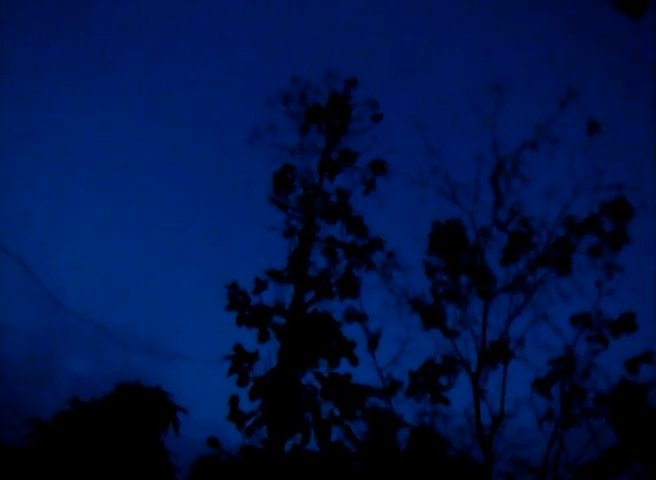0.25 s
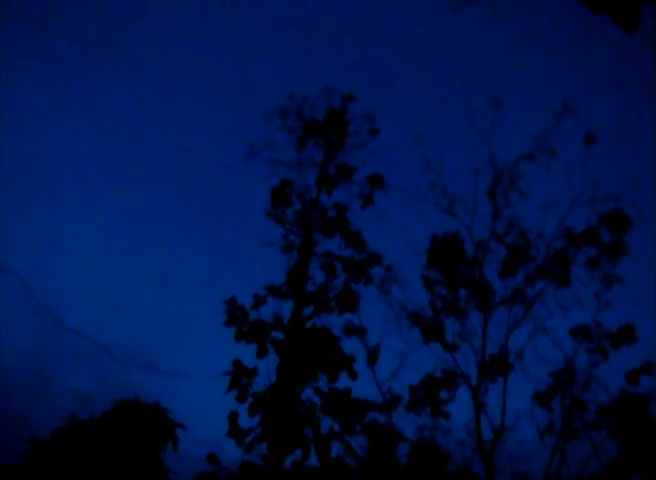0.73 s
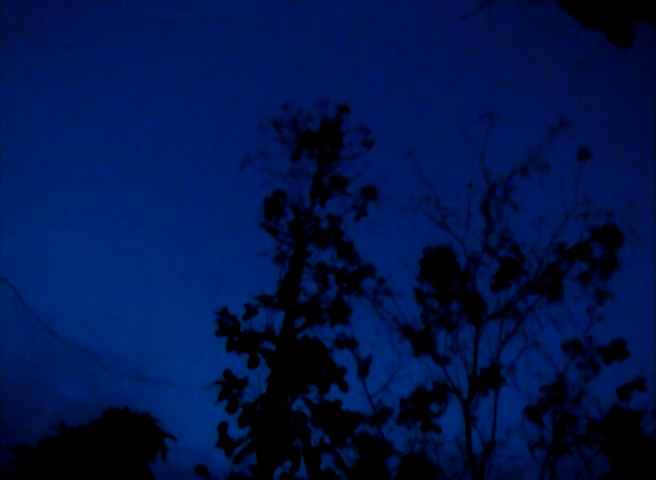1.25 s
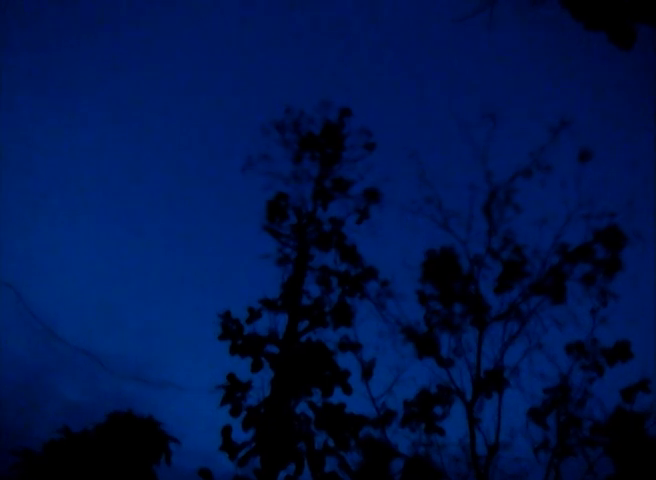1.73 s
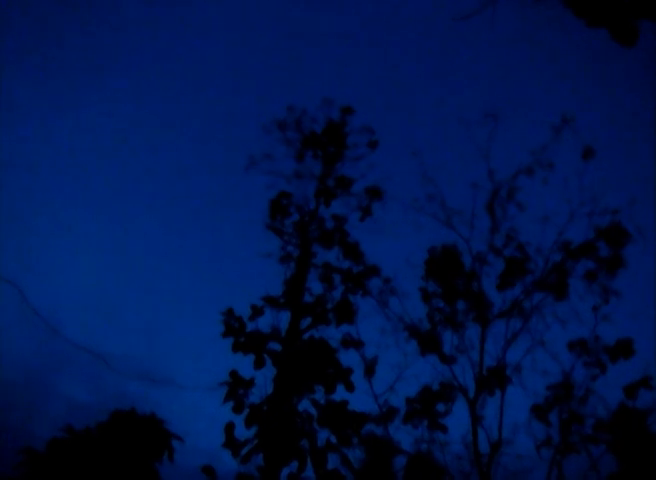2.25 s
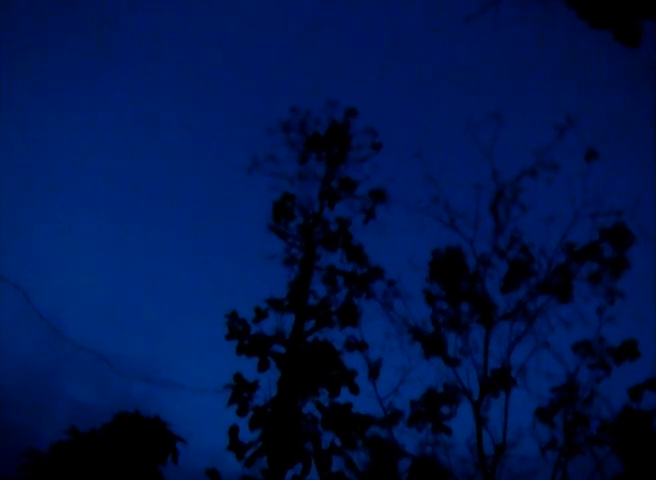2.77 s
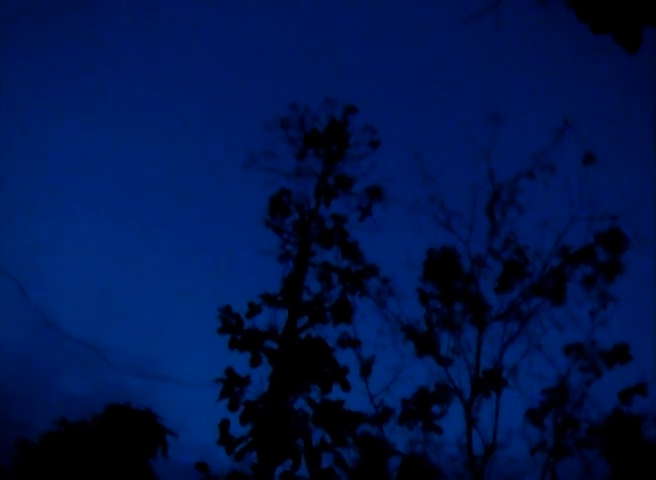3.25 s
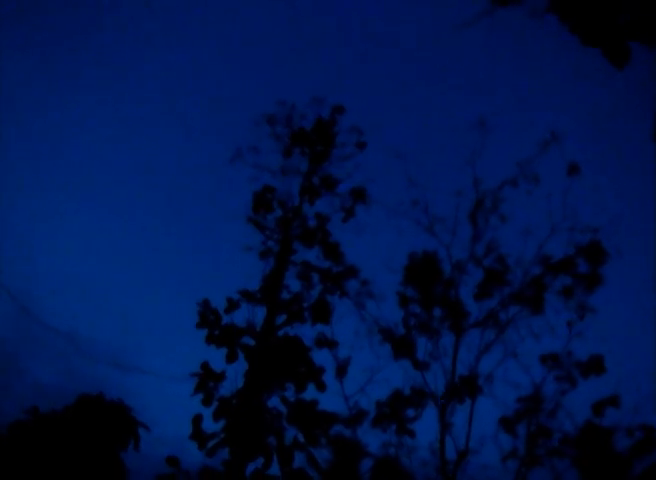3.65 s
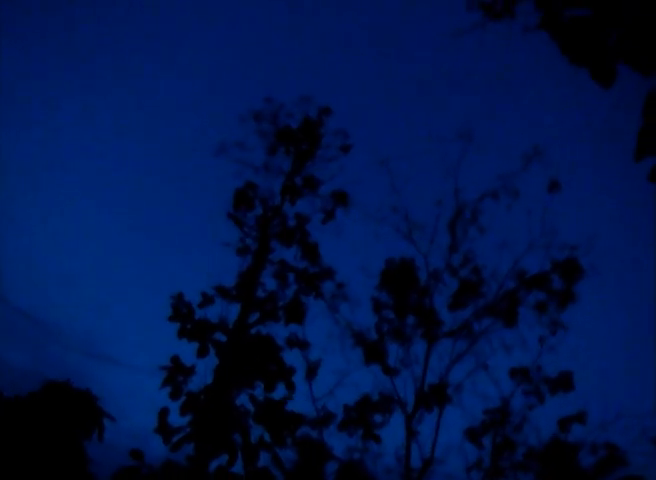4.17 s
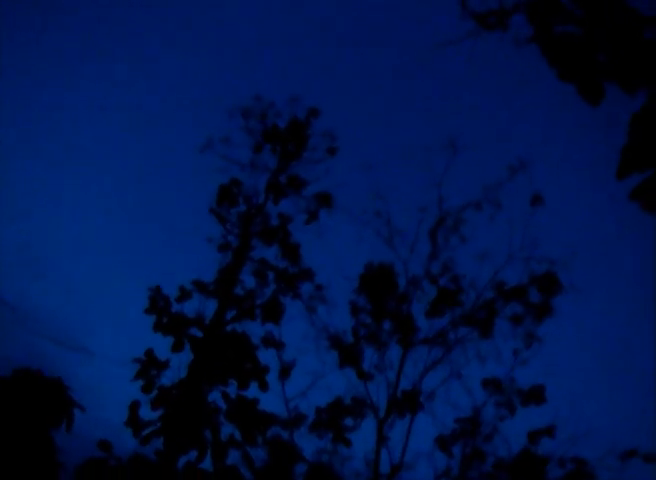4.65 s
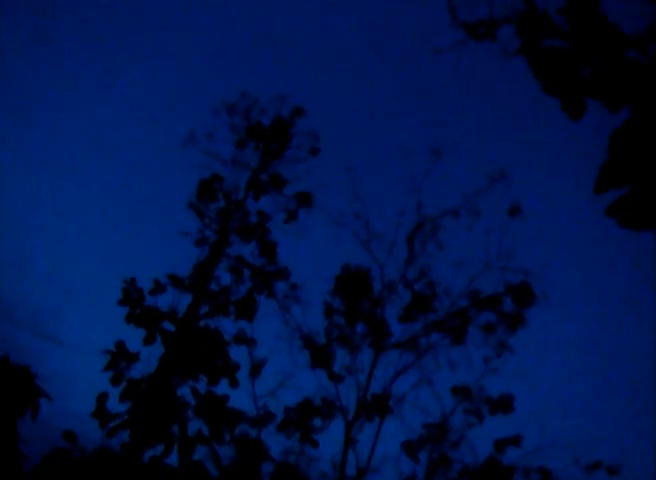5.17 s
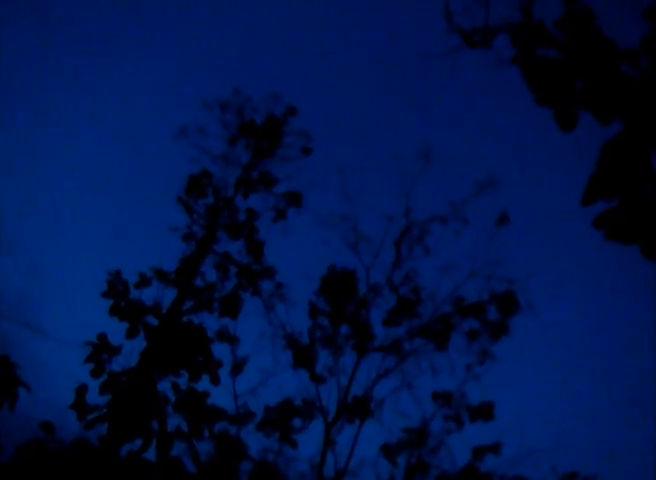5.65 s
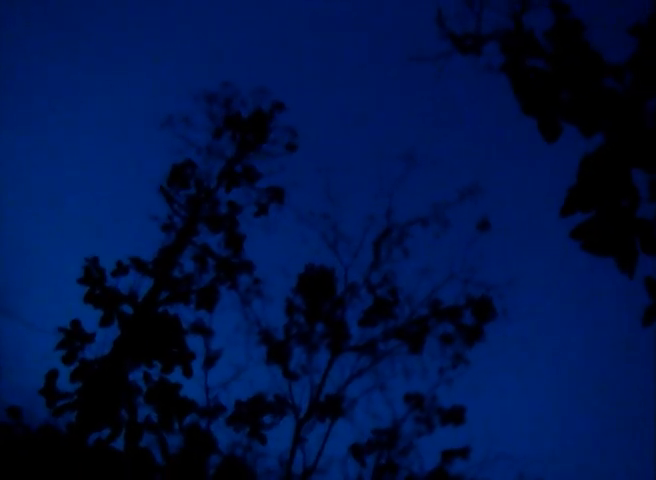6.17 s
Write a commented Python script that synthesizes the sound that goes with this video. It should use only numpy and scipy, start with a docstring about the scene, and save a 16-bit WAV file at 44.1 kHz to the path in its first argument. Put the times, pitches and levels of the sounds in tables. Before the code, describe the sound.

In a wood at dawn, a soft rush of air and wavering insect hiss lie under a blurred far flock. A small songbird slurs thin high notes while crows caw, echoing off trunks. At two seconds a close bird gives a rapid run of clear whistles sinking in pitch for about a second. More crows follow, ending with two rough, nearer caws. Single-channel, slightly dull treble.

```python
"""A wood at dawn, with a soft rush of air, a wavering hiss of insects, a far flock and a faint hum.
Crows caw near and far: harsh buzzes and breath noise, shaken by a rattle and shaped by a throat.
A small songbird slurs thin high notes, each a tone that bends through an arc.
A close bird gives a quick run of whistles that falls in pitch: tones with two weak overtones.
Trunks scatter every call, made by adding many small reflections; one faint dry tick is heard too."""
import sys
import numpy as np
from scipy import signal
from scipy.fft import rfft, irfft, next_fast_len
from scipy.io import wavfile
from scipy.ndimage import map_coordinates

SR = 44100
rng = np.random.default_rng(int(sys.argv[2]) if len(sys.argv) > 2 else 0)


def unload_audio(sound):
    """Save the sound as a 16-bit wav file, at the path given as the first command line argument."""
    columns = np.transpose(np.atleast_2d(sound))
    # keep every value between -1 and 1, then stretch to whole-number steps
    steps = np.round(np.clip(columns, -1, 1) * 32767)
    wavfile.write(sys.argv[1], SR, steps.astype(np.int16))


N = 282681
TIME = np.arange(N) / SR
CUTOFF_HZ = 10100

# rush of distant air, as a noise spectrum: (frequency [Hz], relative level [dB])
AIR = [(25, -32.5), (60, -18), (120, -8.5), (200, -2), (300, -0.5), (400, 3), (520, 0), (800, 1),
       (1700, -3), (2500, -3.5), (3500, -6.5), (5600, -9.5), (8000, -10), (10000, -18)]
# two bands of hiss, as noise spectra: (frequency [Hz], relative level [dB])
HIGH_HISS = [(5500, -22.5), (6400, 1.5), (6900, 6.5), (7250, -0.5), (7900, -44.5)]   # insects
LOW_HISS = [(3700, -27.5), (4250, -3.5), (4550, -1), (4950, -3), (5600, -33)]   # insects, and at first also a haze echoing the songbird
# cawing from far away, blurred into noise: (frequency [Hz], relative level [dB])
FLOCK = [(700, -24), (950, -4), (1300, -2), (1780, 6.5), (2100, -4.5), (2500, -32.5)]
# spells in which the 4.5 kHz hiss is louder: first a haze echoing the songbird, later insects:
# (start [s], end [s], lift [dB])
HISS_SPELLS = [(0, 0.753, 7.5), (4.3, 5.343, 5)]
# songbird notes, with levels before the wood is added: (start [s], length [s], first pitch [Hz],
# middle pitch [Hz], last pitch [Hz], peak level [dB], place of the peak in the note [0-1])
SLURS = [(0, 0.13, 3680, 3860, 4480, -25, 0.48), (0.176, 0.13, 5410, 4590, 4130, -30.5, 0.82),
         (0.395, .056, 4450, 3560, 3310, -26.5, 0.18), (0.542, 0.024, 3820, 4160, 4470, -32, 0.35),
         (0.572, .046, 5240, 4620, 3500, -28, 0.8), (0.696, 0.039, 2870, 3220, 3020, -29, .65),
         (0.911, 0.048, 3900, 4150, 4570, -31, 0.36), (0.949, .15, 3430, 3562, 3190, -27, .65),
         (1.11, .115, 3400, 3780, 3250, -31.5, 0.97), (1.504, 0.072, 4050, 4340, 4600, -32, 0.27),
         (1.556, .17, 3400, 3566, 3160, -28, 0.82), (1.736, 0.095, 3740, 3603, 3300, -37, 0.4)]
# caws: (voice [name], start [s], length [s], top pitch [Hz], last pitch [Hz], level [dB])
# the voice only picks the sound: the falling caw at 4.68 s is the "high" crow, given the "far" sound
CAWS = [("far", .57, .29, 610, 560, -37.5), ("high", .785, .265, 645, 540, -28.5),
        ("far", 1.08, .35, 536, 480, -31.5), ("deep", 1.25, .44, 472, 425, -32),
        ("far", 1.90, .48, 462, 465, -40), ("far", 2.66, .46, 474, 450, -40),
        ("far", 3.27, .32, 520, 470, -35.5), ("deep", 3.27, .41, 456, 385, -30.5),
        ("high", 3.71, .25, 645, 510, -33.5), ("hoarse", 3.76, .47, 760, 580, -41.5),
        ("far", 4.32, .36, 610, 610, -45.5), ("far", 4.68, .36, 535, 410, -40.5),
        ("far", 5.15, .40, 450, 520, -53.5), ("near", 5.607, .268, 580, 410, -25.5),
        ("near", 6.125, .345, 560, 450, -29)]
# throat resonances of each voice, beak open: (frequency [Hz], relative gain [dB])
THROATS = {"near": [(550, -33.5), (850, -17.5), (1100, 0.5), (1400, -1), (1800, 2.5), (2300, -1.5),
           (2600, -18.5), (3150, -11.5), (3540, 1.5), (3950, -18), (4900, -17.5), (5800, -11), (7300, -24),
           (10000, -32)], "deep": [(450, -40.5), (900, -1.5), (1250, -18.5), (1800, 3.5), (2300, -20.5),
           (3100, -21.5), (3570, -10.5), (4300, -25), (10000, -33)], "high": [(630, -29), (1270, 0.5),
           (1850, -1.5), (2550, -7), (3250, -16), (3900, -1.5), (4500, -16.5), (8000, -20.5),
           (10000, -28.5)], "hoarse": [(700, -30), (1400, -9.5), (2200, 0), (3500, -3.5), (5000, -30),
           (10000, -19)], "far": [(520, -33.5), (1000, -18), (1350, -6), (1800, -3), (2150, -6),
           (2600, -23), (3500, -21.5), (10000, -41.5)]}
# pitch start and harshness of each voice: (first pitch / top pitch [ratio], roughness [0-1])
VOICES = {"near": (.68, 0.68), "deep": (.92, 0.622), "high": (0.96, 0.45), "hoarse": (.92, 0.91),
          "far": (0.94, 0.601)}
# reflections of each voice, compared with its direct sound: (near scatter [dB], late echo [dB])
PLACES = {"near": (-7.5, -24.5), "deep": (-3.5, -19), "high": (-2.2, -14), "hoarse": (-9, -24),
          "far": (-2.2, -8.5)}

# average levels in the background, before its dips and lifts
AIR_DB, HIGH_HISS_DB, LOW_HISS_DB, FLOCK_DB = -43, -50, -54.5, -45
SPELL_EDGE_S = 0.12
HUM_HZ, HUM_DB = 195, -70
# all of the background but the hum dips abruptly, and later comes part of the way back
DIP_S, DIP_FALL_S, DIP_DB = 1.889, 0.024, 8.5
RETURN_S, RETURN_RISE_S, RETURN_DB = 2.85, 0.59, 3
TICK_S, TICK_DB = 6.063, -39
# the run of whistles quickens to a steady beat while its pitch sinks towards a resting note
RUN_START_S, WHISTLE_COUNT = 2.010, 13
BEAT_S, FIRST_BEAT_EXTRA_S, QUICKEN_NOTES = .0815, .033, 1.65
WHISTLE_S, WHISTLE_PER_BEAT = 0.041, 0.38   # length at the steady beat; share of extra beat time filled
FIRST_HZ, REST_HZ, SINK_S = 2924, 2521, 0.496
RUN_DB, FIRST_NOTE_SOFTER_DB = -16.5, 2.5
SWELL_DB_PER_S, PEAK_AFTER_S, FADE_DB_PER_S = 2.5, 0.83, 61.5   # swells slightly, then dies away
MELLOW_FROM_S, MELLOW_BY_S = 2.34, 2.77   # later notes start softly, with less flick and fainter overtones


def from_db(db):
    """Decibels to gain."""
    return 10 ** (np.asarray(db) / 20)


def rms_one(x):
    """Scale a sound to an average (rms) level of 1."""
    return x / np.sqrt(np.mean(x ** 2) + 1e-20)


def ramp(start_s, length_s):
    """A straight rise from 0 to 1."""
    return np.clip((TIME - start_s) / length_s, 0, 1)


def at_hz(points, hz):
    """Gain of a (frequency [Hz], level [dB]) table, read on a log-frequency axis."""
    table = np.array(points)
    log_hz = np.log(np.maximum(hz, 1))
    return from_db(np.interp(log_hz, np.log(table[:, 0]), table[:, 1]))


def coloured(x, points):
    """Filter a sound by the frequency balance of a table."""
    size = next_fast_len(len(x) + SR // 20)
    gain = at_hz(points, np.fft.rfftfreq(size, 1 / SR))
    return irfft(rfft(x, size) * gain, size)[:len(x)]


def wander(rate_hz, size):
    """Smooth random motion of unit size, up to about the given rate."""
    step = SR / (2 * rate_hz)
    knots = rng.standard_normal(int(size / step) + 3)
    return rms_one(map_coordinates(knots, [np.arange(size) / step], order=2, mode="nearest"))


def add(out, start_s, sound):
    """Mix a sound in at its time."""
    i = max(int(start_s * SR), 0)
    out[i:i + len(sound)] += sound[:max(N - i, 0)]


def scatter(x, t60, first_s, build_s, per_s=2500):
    """Many small reflections from trunks and leaves build up, then die away by 60 dB in t60 seconds."""
    t = np.arange(int(1.5 * SR)) / SR
    taps = rng.standard_normal(len(t)) * (rng.random(len(t)) < per_s / SR)
    build_up = 1 - np.exp(-np.maximum(t - first_s, 0) / build_s)
    taps *= build_up * from_db(-60 * t / t60)
    taps /= np.sqrt(np.sum(taps ** 2) + 1e-20)   # unit energy
    return signal.fftconvolve(x, taps)[:N]


def background(throb_db=2.03, throb_hz=14):
    """Filtered noise makes the air, two throbbing bands of hiss and the far flock; a wavering tone hums."""
    spells_db = sum(lift_db * (ramp(start - SPELL_EDGE_S, SPELL_EDGE_S) - ramp(end, SPELL_EDGE_S))
                    for start, end, lift_db in HISS_SPELLS)
    out = from_db(AIR_DB) * rms_one(coloured(rng.standard_normal(N), AIR))
    layers = ((HIGH_HISS, HIGH_HISS_DB),
              (LOW_HISS, LOW_HISS_DB + spells_db),
              (FLOCK, FLOCK_DB))
    for band, db in layers:
        throb = from_db(db + throb_db * wander(throb_hz, N))
        out += throb * rms_one(coloured(rng.standard_normal(N), band))
    out *= from_db(RETURN_DB * ramp(RETURN_S, RETURN_RISE_S) - DIP_DB * ramp(DIP_S, DIP_FALL_S))
    hum = (1 + .5 * wander(2.6, N)) * np.sin(2 * np.pi * HUM_HZ * TIME + wander(4.2, N))
    return out + from_db(HUM_DB) * rms_one(hum)


def tick(decay_s=0.0049):
    """One faint dry tick, as of a twig: a burst of mid-range noise that dies at once."""
    t = np.arange(SR // 20) / SR
    band = signal.butter(2, [700, 4500], "band", fs=SR, output="sos")
    crack = signal.sosfilt(band, rng.standard_normal(len(t)))
    out = np.zeros(N)
    add(out, TICK_S, from_db(TICK_DB) * rms_one(crack) * np.exp(-t / decay_s))
    return out


def songbird(fade_s=0.0018, swell_db=9, ebb_db=6, waver=0.013, flutter_db=3, direct_db=-1.5, scatter_db=-2.5):
    """Slightly burred notes from deeper in the wood: each bends through one arc, swells and ebbs."""
    dry = np.zeros(N)
    for start, length, first_hz, middle_hz, last_hz, db, peak_at in SLURS:
        t = np.arange(int(length * SR)) / SR
        u = t / t[-1]   # progress through the note, 0-1
        curve = np.polyfit([0, .5, 1], [first_hz, middle_hz, last_hz], 2)
        pitch = np.polyval(curve, u) * (1 + waver * wander(246.6, len(t)))
        phase = 2 * np.pi * np.cumsum(pitch) / SR
        fade = np.clip(np.minimum(t, t[-1] - t) / fade_s, 0, 1)
        swell = np.interp(u, [0, np.clip(peak_at, 0, 1), 1], [-swell_db, 0, -ebb_db])
        level = from_db(db + swell + flutter_db * wander(70, len(t)))
        add(dry, start, np.sqrt(2) * fade * level * np.sin(phase))
    reflections = scatter(dry, t60=0.73, first_s=0.0033, build_s=0.007)
    return from_db(direct_db) * dry + from_db(scatter_db) * reflections


def through_throat(x, throat, opening, narrow=0.12, dull_db=11):
    """Resonances rise and the treble comes out as the beak opens (opening 0-1)."""
    hz, s, frames = signal.stft(x, SR, nperseg=512)
    closed = 1 - np.interp(s * SR, np.arange(len(x)), opening)
    treble = np.clip(np.log2(np.maximum(hz, 1) / 2500), 0, 1)[:, None]
    resonance = at_hz(throat, hz[:, None] / (1 - narrow * closed))
    gain = resonance * from_db(-dull_db * treble * closed)
    return signal.istft(frames * gain, SR)[1][:len(x)]


def caw(throat, length, first_hz, top_hz, last_hz, rough,
        crest=.46, jitter=0.0396, rattle_hz=95, rattle=0.36):
    """A harsh buzz on an arched pitch, shaken by an uneven rattle and shaped by the throat."""
    size = int(length * SR)
    u = np.arange(size) / size   # progress through the caw, 0-1
    rise = np.maximum(1 - u / crest, 0)   # 1 to 0 before the crest
    fall = np.maximum((u - crest) / (1 - crest), 0)   # 0 to 1 after it
    pitch = top_hz + (first_hz - top_hz) * rise ** 1.7 + (last_hz - top_hz) * fall ** 2.5
    pitch = pitch * (1 + rough * jitter * wander(260, size) + 0.00798 * wander(34.18, size))
    phase = 2 * np.pi * np.cumsum(pitch) / SR
    overtone_count = int(CUTOFF_HZ / top_hz)
    buzz = rms_one(sum(np.cos(k * phase) for k in range(1, overtone_count + 1)))
    uneven_hz = rattle_hz * (1 + 0.298 * wander(50, size))
    shake = np.sin(2 * np.pi * np.cumsum(uneven_hz) / SR)
    air = rng.standard_normal(size) * (1 + np.cos(phase))   # air escapes once a cycle
    voice = np.sqrt(max(1 - rough ** 2, 0)) * buzz + rough * air
    voice = voice * np.exp(rough * rattle * shake)
    swell = np.interp(u, [0, .08, .2, .4, .75, .93, 1], [0.16, 0.54, 0.93, 0.91, 0.75, 0.6, 0.076])
    opening = 1 - rise ** 2 - fall ** 2.7
    return rms_one(through_throat(voice, throat, opening) * swell)


def crows():
    """Each voice is heard directly, through the near trees and off a farther stand."""
    out = np.zeros(N)
    for name, (scatter_db, echo_db) in PLACES.items():
        dry = np.zeros(N)
        first, rough = VOICES[name]
        for voice, start, length, top_hz, last_hz, db in CAWS:
            if voice == name:
                call = caw(THROATS[name], length, first * top_hz, top_hz, last_hz, rough)
                add(dry, start, from_db(db) * call)
        near = from_db(scatter_db) * scatter(dry, t60=0.44, first_s=0.0062, build_s=0.0087)
        late = from_db(echo_db) * scatter(dry, t60=0.83, first_s=0.12, build_s=0.054)
        # share the level between the direct sound and its reflections
        out += (dry + near + late) / np.sqrt(1 + from_db(scatter_db) ** 2 + from_db(echo_db) ** 2)
    return out


def whistle_run():
    """The notes of the falling run: (start [s], length [s], central pitch [Hz], level [dB])."""
    note = np.arange(WHISTLE_COUNT)
    extra = FIRST_BEAT_EXTRA_S * np.exp(-note / QUICKEN_NOTES)
    since = note * BEAT_S + np.cumsum(extra) - extra   # seconds since the run began
    hz = REST_HZ + (FIRST_HZ - REST_HZ) * np.exp(-since / SINK_S)
    swell_db = np.minimum(SWELL_DB_PER_S * (since - PEAK_AFTER_S), FADE_DB_PER_S * (PEAK_AFTER_S - since))
    db = RUN_DB + swell_db - FIRST_NOTE_SOFTER_DB * (note == 0)
    return zip(RUN_START_S + since, WHISTLE_S + WHISTLE_PER_BEAT * extra, hz, db)


def whistler(flick=.085, flick_s=0.0052, sag=0.019, drop=0.043, drop_s=0.002, waver=0.0094,
             soft_start_db=-12, second_db=-12.0, third_db=-23.0, flutter_db=3.5, shake_db=1.4,
             scatter_db=-7.5):
    """Each whistle flicks down onto its pitch, sags, and drops away as the bird cuts it off."""
    dry = np.zeros(N)
    for start, length, hz, db in whistle_run():
        t = np.arange(int(length * SR)) / SR
        u = t / t[-1]   # progress through the note, 0-1
        mellow = np.interp(start, [MELLOW_FROM_S, MELLOW_BY_S], [0, 1])
        flick_down = flick * (1 - 0.37 * mellow) * np.exp(-t / flick_s)
        sagging = sag * ((1 - u) ** 2 - .2)
        cut_off = drop * np.exp((t - t[-1]) / drop_s)
        pitch = hz * (1 + flick_down + sagging - cut_off)
        pitch = pitch * (1 + waver * wander(252, len(t)))
        phase = 2 * np.pi * np.cumsum(pitch) / SR
        swell = np.interp(u, [0, .08, .3, .72, .88, 1], [0.1, 0.61, 0.94, 0.98, 0.78, 0.06])
        effort = np.sqrt(2) * from_db(db) * swell
        soft_start = soft_start_db * mellow * np.interp(u, [.2, .36], [1, 0])
        tone = from_db(soft_start + shake_db * wander(70, len(t))) * np.sin(phase)
        overtones = from_db(second_db) * np.sin(2 * phase) + from_db(third_db) * np.sin(3 * phase)
        brightness = from_db(-6 * mellow - 5.6 * u + flutter_db * wander(85.5, len(t)))
        add(dry, start, effort * (tone + brightness * overtones))
    return dry + from_db(scatter_db) * scatter(dry, t60=0.65, first_s=0.021, build_s=0.0039)


def scene():
    """All the birds and the tick over the background, in one channel."""
    return (background() + tick() + songbird() + crows() + whistler())[None]


def record(dry):
    """A steep filter cuts the sound above CUTOFF_HZ."""
    return signal.sosfilt(signal.ellip(12, .2, 80, CUTOFF_HZ, fs=SR, output="sos"), dry)


dry = scene()
out = record(dry)
unload_audio(out)
```